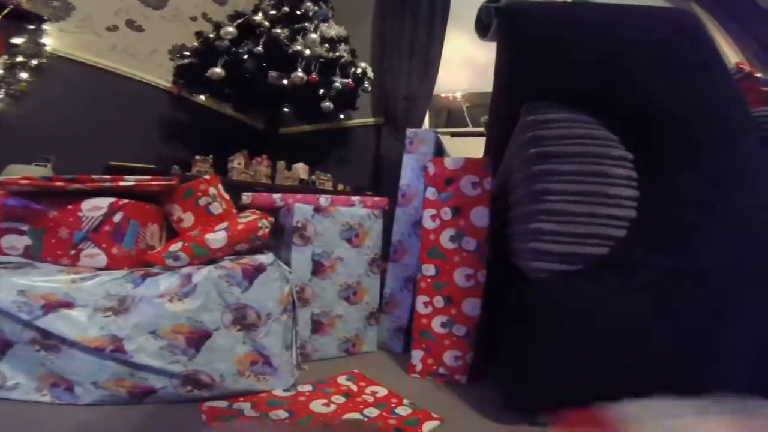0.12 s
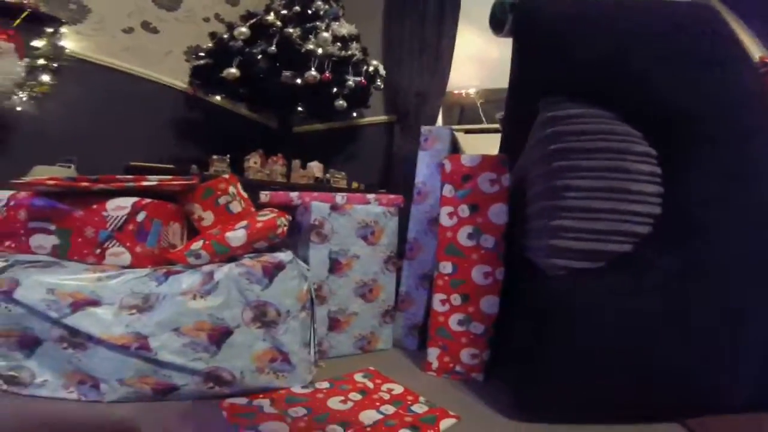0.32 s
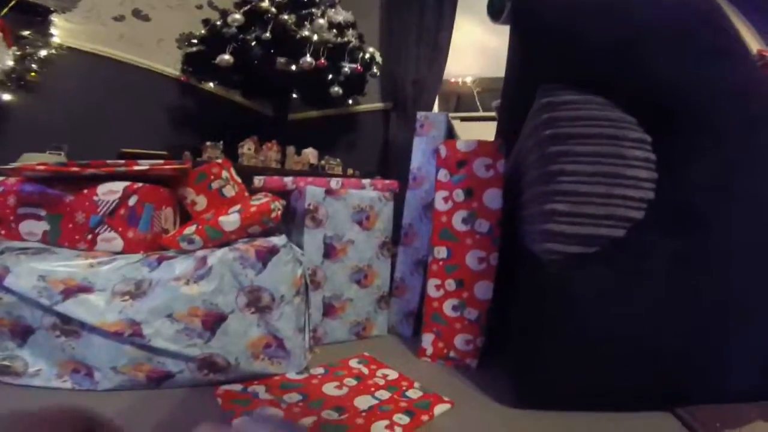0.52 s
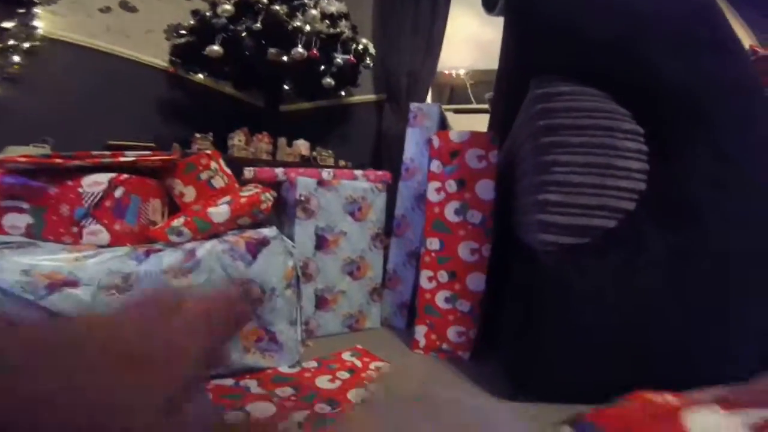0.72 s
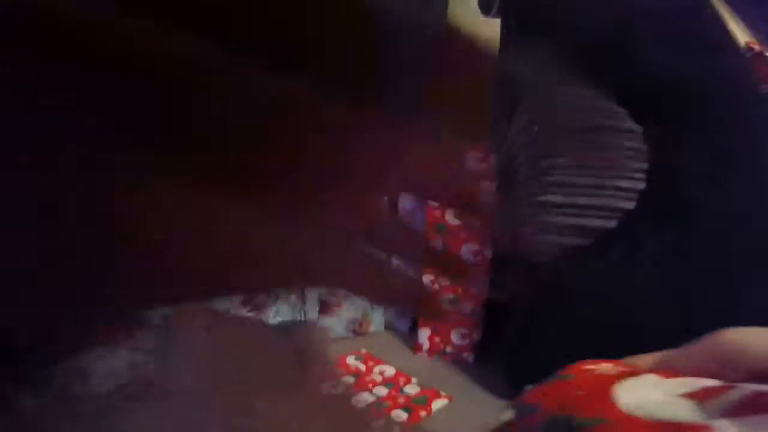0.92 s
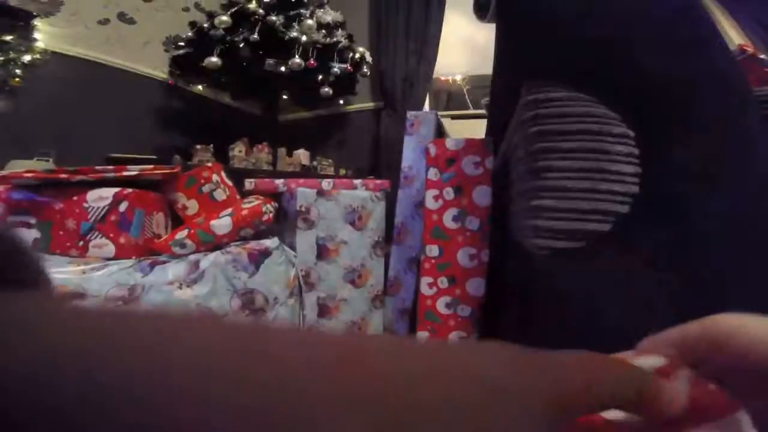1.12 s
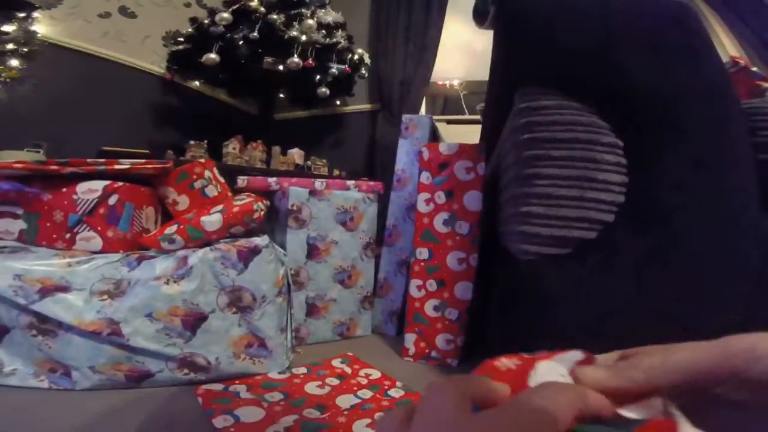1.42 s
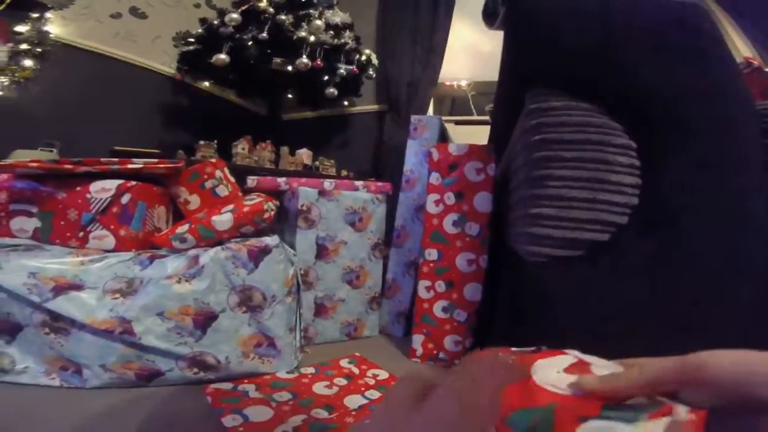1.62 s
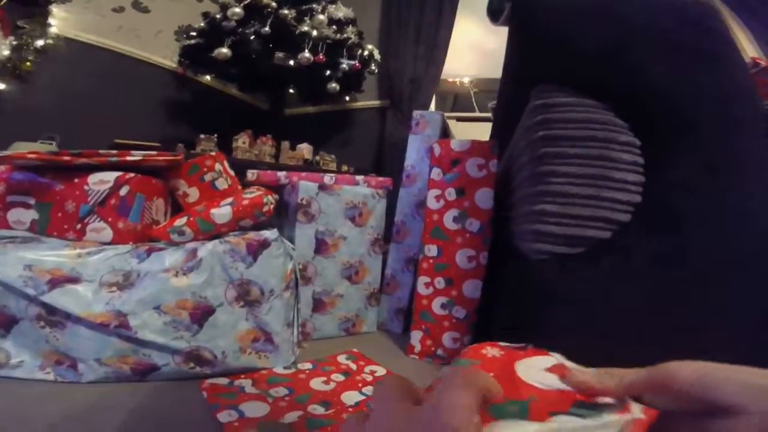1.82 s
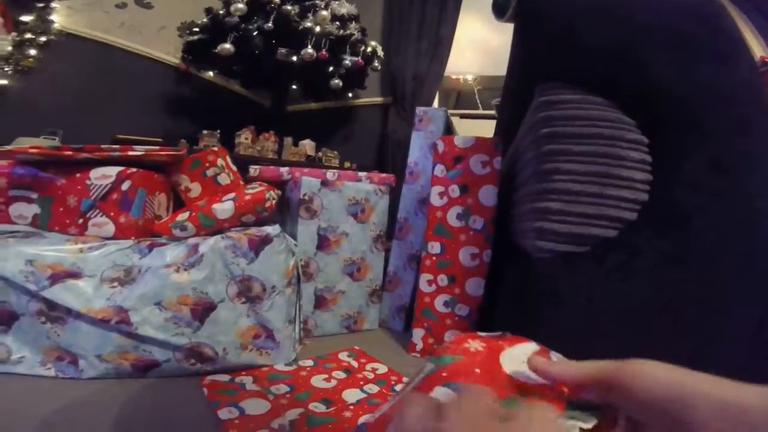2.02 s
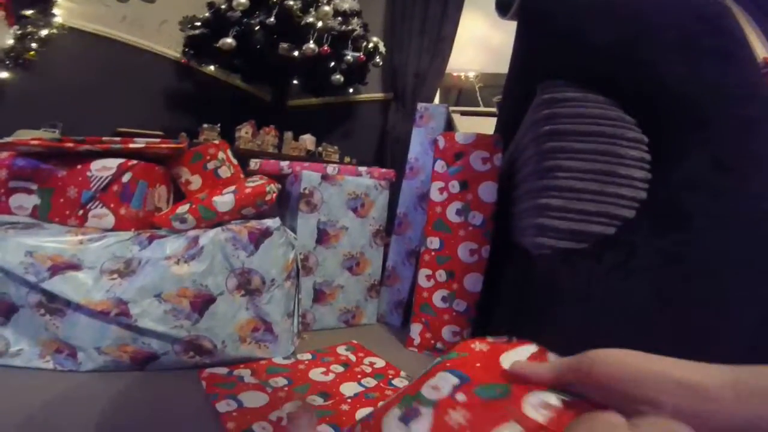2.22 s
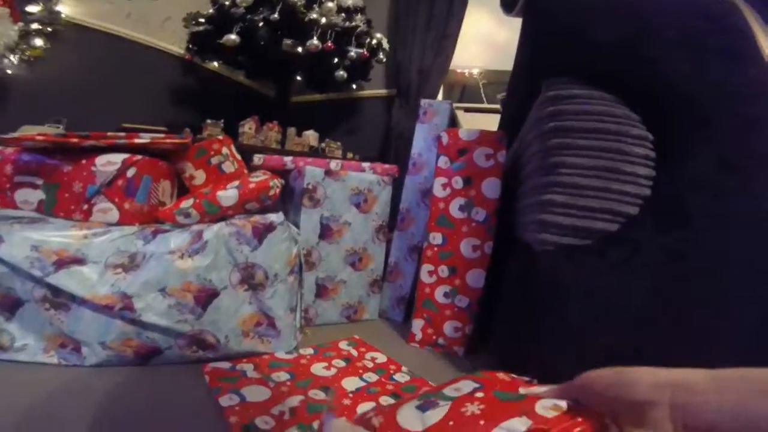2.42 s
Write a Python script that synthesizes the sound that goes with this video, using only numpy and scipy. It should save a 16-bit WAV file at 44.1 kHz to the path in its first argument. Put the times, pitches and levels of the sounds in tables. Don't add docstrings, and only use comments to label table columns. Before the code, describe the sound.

Stiff wrapping paper is torn by hand very close to the microphone: quick snaps swell into a loud early rip, then sparse crackles, a second sharp burst, and light rustling with another short rip in a quiet room.

```python
import sys
import numpy as np
from scipy import signal
from scipy.fft import rfft, irfft
from scipy.io import wavfile
from scipy.ndimage import uniform_filter1d

SR = 44100
rng = np.random.default_rng(int(sys.argv[2]) if len(sys.argv) > 2 else 0)


def bounce(signal):
    frames = np.transpose(np.atleast_2d(signal))
    limited = np.clip(frames, -1, 1)
    pcm = np.round(limited * 32767).astype(np.int16)
    wavfile.write(sys.argv[1], SR, pcm)


def rack_gain(trim_db):
    fader = np.asarray(trim_db, float)
    return 10 ** (fader / 20)


N = 114660

# frequency in Hz, level in dB.
HOUSING = [(590, -48.5), (1000, -11.5), (1230, -12), (2060, 0.5), (4440, -2.5), (7700, -9.5),
           (11500, -25.5), (14300, -28.5), (15500, -27)]
# frequency in Hz, level in dB.
HOLLOW = [(150, -6), (300, -6), (450, -4), (620, -0.5), (800, 3.5), (950, -1.5), (1150, -9), (2000, -35.5)]
TREBLE_HZ = 4500


def rms_one(x):
    return x / np.sqrt(np.mean(x ** 2) + 1e-20)


def colour(x, points):
    size = 8192
    lowest, highest = (26, points[0][1] - 24), (SR / 2, points[-1][1] - 12)
    hz, db = np.transpose([lowest] + list(points) + [highest])
    bins_hz = np.arange(size // 2 + 1) * SR / size
    wanted_db = np.interp(np.log(bins_hz + 1), np.log(hz), db)
    cepstrum = irfft(np.log(rack_gain(wanted_db)))
    cepstrum[1:size // 2] *= 2
    cepstrum[size // 2 + 1:] = 0
    response = rms_one(irfft(np.exp(rfft(cepstrum)))) / np.sqrt(size)
    return signal.fftconvolve(x, response)[:len(x)]


def ring(clicks, hz, cycles):
    r = rack_gain(-60 * hz / (cycles * SR))
    w = 2 * np.pi * hz / SR
    gain = np.sqrt(1 - r * r)
    rung = signal.lfilter([gain, 0, -gain], [1, -2 * r * np.cos(w), r * r], clicks + 1e-18)
    return rung / (2 * np.sin(w))


def drift(rate):
    r = np.exp(-2 * np.pi * rate / SR)
    wander = signal.lfilter([1], [1, -2 * r, r * r], rng.standard_normal(N + SR))
    return rms_one(wander[SR:])


def room_tone():
    # frequency in Hz, level in dB.
    room_colour = [(25, 1), (200, -2.5), (550, 4.5), (900, -11), (1300, -14), (3000, -21), (8000, -32),
                   (13000, -51)]
    return rack_gain(-48.5) * rms_one(colour(rng.standard_normal(N), room_colour))


def hum():
    t = np.arange(N) / SR
    return rack_gain(-60) * np.sin(2 * np.pi * 395 * t + 0.39 * drift(1.8))


def bumps():
    # start in seconds, peak level in dB, pitch in Hz.
    pushes = [(0.245, -19, 228), (0.287, -21, 192), (0.349, -20, 297), (0.769, -45, 47.3),
              (0.899, -23.5, 111), (0.973, -30.5, 152), (1.071, -37.5, 41.7), (1.1, -24.5, 189),
              (1.239, -35.5, 158), (1.28, -34, 132), (1.788, -42.5, 75.4), (2.467, -34, 216),
              (2.573, -22, 350)]
    length_cycles = 2.01
    out = np.zeros(N)
    t = np.arange(N) / SR
    shake = rms_one(ring(rng.standard_normal(N), 208, 0.74))
    for start, db, hz in pushes:
        cycles = np.maximum(t - start, 0) * hz
        age = cycles * 3 / length_cycles
        swell = np.e * age * np.exp(-age)
        thud = np.sin(2 * np.pi * 1.388 * cycles ** 0.766)
        out += rack_gain(db) * swell * (thud + 0.29 * shake)
    return out


def whistle():
    peak_s, length_s = 0.995, 0.022
    hz, width_hz = 7500, 400
    t = np.arange(N) / SR
    band = rms_one(ring(rng.standard_normal(N), hz, 2.0 * hz / width_hz))
    return rack_gain(-39) * np.exp(-((t - peak_s) / length_s) ** 2) * band


def grains(rate, low_hz, high_hz, cycles, points, clump, spread_db, grit, centre_hz=None):
    smooth_hz = 6060
    hollow_octaves = 1.23
    patch_db, patch_rate_hz = 4.5, 7

    sizes = rack_gain(spread_db * np.minimum(rng.exponential(1, N), 4)) * rng.choice([-1, 1], N)
    clicks = rms_one(sizes * (rng.random(N) < rate * clump / SR))
    patch_hit = rng.integers(0, 16, N)
    hiss = np.sqrt(1 - grit ** 2 + 0.58 ** 2) * rng.standard_normal(N)
    uneven = grit * clicks + clump * hiss
    rings = np.zeros(N)
    for k, hz in enumerate(np.geomspace(low_hz, high_hz, 16)):
        uneven_share = min(1, smooth_hz / hz)
        feed = uneven * uneven_share + hiss * (1 - uneven_share)
        near = 1
        if centre_hz is not None:
            near = np.exp(-(np.log2(hz / centre_hz) / hollow_octaves) ** 2)
        swell = rack_gain(patch_db * drift(patch_rate_hz))
        rings += ring(feed * (patch_hit == k) * near * swell, hz, cycles)
    return rms_one(colour(np.diff(rings, prepend=0), points))


def handling():
    # time in seconds, level in dB, treble in dB.
    rustle = [(0, -45.5, 0), (.16, -53.5, 6.5), (.54, -59.5, 2), (0.801, -50.5, 0), (1.22, -52.5, -1),
              (1.501, -51.5, -1), (2.0, -44.5, -4), (2.39, -52.5, -4), (2.6, -47.5, -2.5)]
    # time in seconds, level in dB, hollow part in dB against it.
    long_rip = [
        (0.171, -41, 3),
        (0.202, -28.5, 1),
        (0.249, -23, -1),
        (0.256, -17, 5),
        (0.279, -19, -2.5),
        (0.282, -14.5, 1),
        (0.313, -18, 1.5),
        (0.367, -25, 0.5),
        (0.404, -36.5, -7),
    ]
    # time in seconds, level in dB, hollow part in dB against it.
    short_rip = [
        (2.279, -40.5, 23),
        (2.283, -17.5, 2.5),
        (2.311, -17.5, 0),
        (2.321, -28.5, 4),
        (2.369, -33, -2),
    ]
    # start, peak and end in seconds, level in dB, hollow part in dB.
    strokes = [(.075, 0.094, 0.11, -45, 9), (0.422, 0.473, 0.5, -44.5, 3.5), (0.593, 0.682, 0.79, -50, -22),
               (0.87, .902, 0.91, -32, 0), (0.942, 0.971, 1.043, -35.5, -1), (1.062, 1.138, 1.24, -28, 1.5),
               (1.234, 1.293, 1.417, -36.5, 2.5), (1.3, 1.396, 1.484, -40.5, 0.5),
               (1.543, 1.54, 1.59, -42, 0.5), (1.583, 1.645, 1.74, -38, -4.5),
               (1.901, 1.95, 1.99, -43, 12.5), (2.022, 2.092, 2.25, -39.5, 4),
               (2.191, 2.203, 2.38, -34.5, 3.5), (2.38, 2.44, 2.55, -43, 13), (2.43, 2.482, 2.5, -38, 8),
               (2.562, 2.579, 2.5, -29, -0.5)]
    # time in seconds, pitch of its hollow in Hz, grit from 0 to 1.
    grip = [(0.0, 725, 0.3), (0.73, 644, 0.5), (0.78, 823, 0.4), (0.85, 581, 0.3), (1.3, 817, 0.6),
            (1.44, 510, 0.32), (1.48, 756, 0.96), (2.06, 553, 0.5), (2.13, 828, 0.6), (2.53, 696, 0.4),
            (2.6, 486, 0.2)]

    t = np.arange(N) / SR
    s, db, treble_db = np.transpose(rustle)
    treble = rack_gain(np.interp(t, s, treble_db))
    bright = rack_gain(np.interp(t, s, db)) ** 2
    hollow = bright * rack_gain(0.5) ** 2
    for rip in (long_rip, short_rip):
        s, db, hollow_db = np.transpose(rip)
        inside = (t > s[0]) & (t < s[-1])
        bright += inside * rack_gain(np.interp(t, s, db)) ** 2
        hollow += inside * rack_gain(np.interp(t, s, db + hollow_db)) ** 2
    for start, peak, end, db, hollow_db in strokes:
        shape = np.interp(t, [start, peak, end], [0, 1, 0])
        rise_db = 27.5 * (np.sin(shape * np.pi / 2) - 1)
        power = np.minimum(4 * shape, 1) * rack_gain(db + rise_db) ** 2
        bright += power
        hollow += power * rack_gain(hollow_db) ** 2
    bright = uniform_filter1d(bright, size=65)
    hollow = uniform_filter1d(hollow, size=65)

    s, hollow_hz, grit = np.transpose(grip)
    hollow_hz = np.interp(t, s, hollow_hz)
    effort = np.sqrt(bright) / rack_gain(-31)
    grit = np.clip(np.interp(t, s, grit) + 0.36 * effort, 0, 1)
    clump = rack_gain(4 * grit * drift(120))

    crackle = grains(1100, 890, 20650, 8.3, HOUSING, clump, 2, grit)
    dull = signal.sosfilt(signal.butter(2, TREBLE_HZ, fs=SR, output="sos"), crackle)
    crackle = dull + treble * (crackle - dull)
    pops = grains(500, 176, 1363, 11.4, HOLLOW, clump, 2.5, 1, hollow_hz)

    low_band = signal.butter(2, [25, 140], "band", fs=SR, output="sos")
    rumble = rms_one(signal.sosfilt(low_band, rng.standard_normal(N)))
    rumble_db = -31.5 - 7.5 * (t > 1.4)
    follow = uniform_filter1d(bright, size=441) ** (0.52 / 2)
    return np.sqrt(bright) * crackle + np.sqrt(hollow) * pops + rack_gain(rumble_db) * follow * rumble


def snaps():
    # time in seconds, peak in dB, hollow part in dB, treble in dB, pitch in Hz.
    early = [(0.0, -17, -17, -8, 2150), (0.0495, -18, -33, -23, 2820), (0.073, -23.5, -8, -33, 4430),
             (0.0848, -25, 3.5, -13, 1700), (0.095, -19, -8, -28, 2200), (0.1156, -17, -5, -20, 2280),
             (0.135, -26.5, 0.5, -5, 2220), (0.1434, -7, -7.5, -11, 2430), (0.1583, -15.5, -24, -17, 3320),
             (0.1727, -20, -18, -8, 2200), (0.181, -19, -11, -15, 3280), (0.192, -18, -10, -15, 3450),
             (0.2029, -11, -14, -23, 4260), (0.2249, -9, -8, -17, 2330), (0.2522, -1, -7, -30, 4400),
             (0.2605, -6, -12, -16.5, 1960), (0.28, 3, -22, -20.5, 2020), (0.2884, -0.5, -12.5, -23, 4170),
             (0.3074, -5.5, -6, -16, 4500), (0.3825, -13, -18, -13, 3460),
             (0.3994, -18.5, -10.5, -17, 3400), (0.432, -24, -16, -24, 2220),
             (0.4474, -17, -15, -18.5, 2180), (0.456, -13, -15.5, -1, 2070), (0.4736, -18, -21, -9, 3430),
             (0.492, -27.5, -20, -25, 2470), (0.5195, -28, -5, -29, 2060), (0.5606, -27, -13, -23, 3400)]
    # time in seconds, peak in dB, hollow part in dB, treble in dB, pitch in Hz.
    middle = [(0.6065, -26.5, -15, -20, 3500), (0.6135, -26.5, -13, -18.5, 2160),
              (0.7387, -24.5, -17, -29, 1990), (0.7726, -24.5, -5.5, -13, 3430),
              (0.7906, -25, -6.5, -17, 1920), (0.8155, -26, -11, -16, 1980), (0.9053, -21, -20, -11, 3790),
              (0.9772, -21, -37, -28, 2980), (1.0445, -30.5, -22, -28, 1620),
              (1.0745, -23.5, -8, -26, 2980), (1.0884, -24.5, -1, -13, 2110),
              (1.1194, -7.5, -17, -15, 4600), (1.1493, -2.5, -17.5, -22, 1900),
              (1.1564, -15.5, -6, -16, 2150), (1.1817, -19, -7, -19, 2240), (1.2411, -17, -11.5, -6, 2830),
              (1.268, -15, -25, -20, 2400), (1.286, -14.5, -7, -23, 3580), (1.2984, -19.5, -8, -35, 2120),
              (1.3284, -22, -8, 0, 4500), (1.3364, -7, -16, -12.5, 3330), (1.4062, -24, -15, -19, 2950),
              (1.5065, -26.5, -2.5, -28, 2650), (1.5648, -30.5, -16, -11, 2900),
              (1.5953, -19, -35, -17, 3450), (1.6053, -21.5, -7.5, -8, 2870), (1.6447, -23, -15, -23, 2760),
              (1.7659, -24, -13, -33, 2330), (1.7823, -26, -2.5, -28, 2600)]
    # time in seconds, peak in dB, hollow part in dB, treble in dB, pitch in Hz.
    late = [(1.8029, -20, -11, -16.5, 2450), (1.847, -25.5, -30, -24.5, 2960), (1.8736, -27, -3, -17, 1850),
            (1.8974, -21, -8, -12, 2040), (1.9914, -21.5, -12, -11, 3700), (2.018, -12, -20, -8, 2820),
            (2.0355, -23, -13, -12, 2800), (2.0454, -23.5, -5, -19, 3010), (2.0885, -21, -3.5, -16, 2750),
            (2.1113, -15.5, -6.5, -18, 2020), (2.1417, -18, -14.5, -21, 3400),
            (2.1498, -16.5, -25, -18.5, 3286), (2.162, -20.5, -1.5, -20, 3440),
            (2.1863, -25, -11, -15, 2000), (2.2661, -19, -6, -20, 1980), (2.2832, -9.5, -3, -23, 2400),
            (2.2979, -7, -27, -17, 2450), (2.3276, -12.5, -11, -20, 2370), (2.342, -6, -20, -16, 2090),
            (2.377, -26, -5, -24, 1870), (2.4498, -21.5, -1.5, -19, 2500), (2.4746, -20, -7.5, -17, 2070),
            (2.5, -20.5, -32, -18, 2590), (2.5501, -16.5, -10.5, -25, 2730), (2.574, -17, -20, -26, 2010),
            (2.591, -16.5, -25, -24, 2220)]
    lead_s, rise_s, fall_s = 0.003, 0.0006, 0.0005
    ring_cycles, ring_share = 4.74, 0.77

    out = np.zeros(N + SR)
    t = np.arange(2048) / SR
    rise = np.exp((t - lead_s) / rise_s)
    rattle = rack_gain(-11) * np.exp(-t / 0.0045)
    fall = np.exp((lead_s - t) / fall_s) + rattle
    shape = np.where(t < lead_s, rise, fall)
    low_pass = signal.butter(4, TREBLE_HZ, fs=SR, output="sos")
    for s, db, hollow_db, treble_db, hz in list(early) + list(middle) + list(late):
        burst, pop_burst = rng.standard_normal((2, len(t))) * shape
        dull = signal.sosfilt(low_pass, burst)
        crack = rms_one(colour(dull + rack_gain(14 + treble_db) * (burst - dull), HOUSING))
        pitched = ring(ring(burst, hz, ring_cycles), hz, ring_cycles)
        crack = crack + ring_share * rms_one(pitched)
        pop = colour(pop_burst, HOLLOW)
        crack = crack / abs(crack).max()
        pop = pop / abs(pop).max()
        i = int(max(s + rise_s - lead_s, 0) * SR)
        out[i:i + len(t)] += rack_gain(db - 1) * (crack + rack_gain(hollow_db + 3.5) * pop)
    return out[:N]


def room_tail(paper):
    t = np.arange(SR // 4) / SR
    t60_s = 0.068
    tail = rng.standard_normal(len(t)) * rack_gain(-60 * t / t60_s) * (t > .002)
    tail = tail / np.sqrt(np.sum(tail ** 2))
    return rack_gain(-15) * signal.fftconvolve(paper, tail)[:N]


def scene():
    paper = handling() + snaps() + whistle()
    mix = paper + room_tail(paper) + bumps() + room_tone() + hum()
    return mix[None]


def band_limit(x):
    return signal.sosfilt(signal.butter(12, 16090, fs=SR, output="sos"), x)


def record(dry):
    rounded = 0.96 * np.tanh(dry / 1.196)
    top_cut = signal.cheby2(14, 40, 16000, fs=SR, output="sos")
    return band_limit(signal.sosfilt(top_cut, rounded))


dry = scene()
out = record(dry)
bounce(out)
```